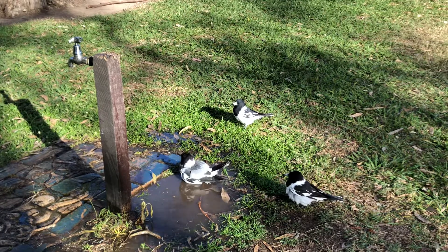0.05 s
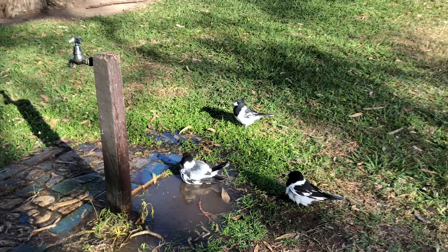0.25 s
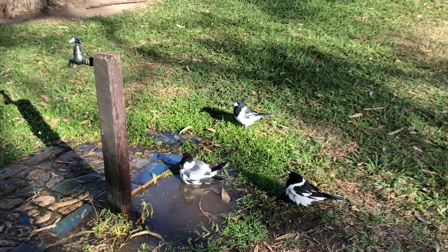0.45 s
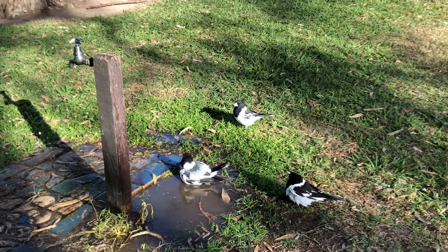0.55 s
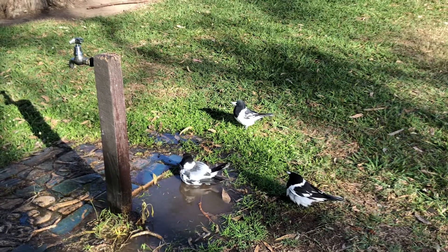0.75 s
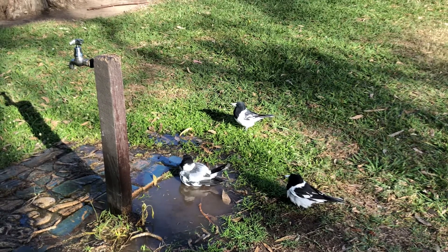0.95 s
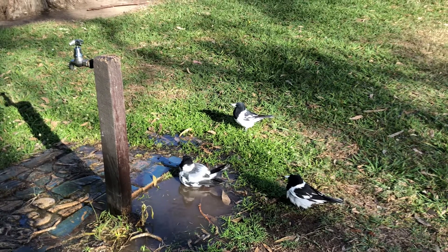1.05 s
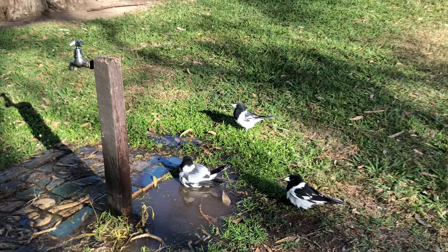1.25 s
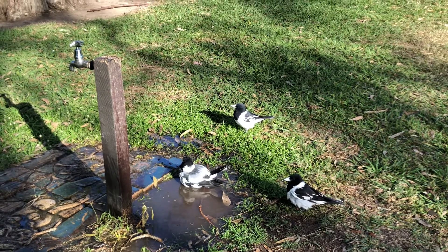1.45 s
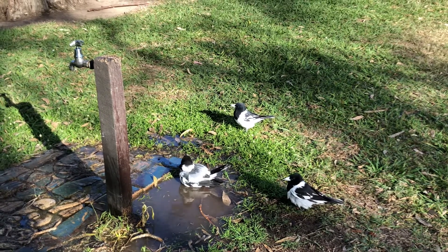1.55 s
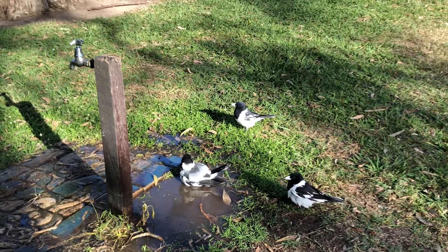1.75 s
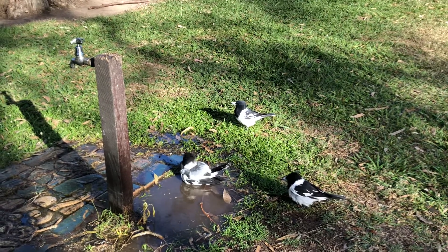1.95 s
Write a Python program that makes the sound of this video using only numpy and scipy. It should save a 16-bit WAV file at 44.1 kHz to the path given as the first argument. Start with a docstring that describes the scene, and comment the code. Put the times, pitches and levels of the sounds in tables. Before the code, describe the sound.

Wind rumbles on the microphone over a steady outdoor hiss, gusting with abrupt thumps near 0.4, 0.85 and 1.3 seconds. Far-off small birds give faint rising whistles throughout, and a bird in a puddle makes tiny ticks and barely audible splashes until about 1.4 seconds. From 1.5 seconds the wind drops and the birds chatter faintly, with a soft, short hoarse call near 1.9 seconds.

```python
"""A grassy yard on a breezy day. It opens on steady outdoor hiss and a low wind rumble on the microphone.
Close by, a bird bathing in a puddle makes a few tiny ticks, then a faint high rustle, while small birds
far off in the trees start trading chirps and rising whistles. Three gusts buffet the microphone with
abrupt thumps, near 0.4 s, 0.85 s and 1.3 s. As the wind drops, the small birds chatter, and at the very
end a bigger one gives a short hoarse call."""
import sys
import numpy as np
from scipy import signal
from scipy.fft import rfft, irfft, next_fast_len
from scipy.io import wavfile
from scipy.ndimage import map_coordinates

SR = 44100
rng = np.random.default_rng(int(sys.argv[2]) if len(sys.argv) > 2 else 0)


def unload_audio(sound):
    """Save the sound as a 16-bit wav file, at the path given as the first command line argument."""
    columns = np.transpose(np.atleast_2d(sound))
    # keep every value between -1 and 1, then stretch to whole-number steps
    steps = np.round(np.clip(columns, -1, 1) * 32767)
    wavfile.write(sys.argv[1], SR, steps.astype(np.int16))


N = 88200

# fader ride of the wind rumble (t/s, relative level/dB)
RUMBLE_RIDE = [(0, -51.5), (.185, -58.5), (.22, -45.5), (.265, -48), (.39, -36.5), (.45, -46.5),
               (.485, -43), (.6, -60), (.635, -44.5), (.755, -47.5), (.85, -42), (.915, -44), (.965, -41),
               (1.0, -50), (1.07, -53.5), (1.17, -54.5), (1.29, -37.5), (1.355, -52.5), (1.44, -42.5),
               (1.6, -55.5), (1.72, -59.5), (1.86, -54.5), (2, -59)]
# colour of the wind rumble (f/Hz, relative level/dB)
RUMBLE_SPECTRUM = [(22, -55), (32, -16), (48, -7.5), (75, -1), (140, -4.5), (210, -12), (290, -26),
                   (450, -32.5), (1500, -89)]
# single eddies rolling over the microphone (peak t/s, length/s, centre f/Hz, level/dB)
BUFFETS = [ (0.119, 0.023, 250, -48.5), (0.272, 0.033, 292, -52.5), (0.316, 0.016, 76.5, -30.5),
           (0.393, 0.038, 106.6, -29), (0.403, 0.058, 257, -46.5), (0.701, 0.024, 273, -49.5),
           (0.71, 0.026, 132, -32), (0.806, 0.019, 98, -32), (0.841, 0.014, 211, -38.5),
           (1.249, 0.033, 169, -29.5), (1.293, 0.039, 92, -32.5), (1.395, 0.019, 156, -33),
           (1.924, 0.14, 201, -60)]
# pressure kicks on the microphone (t/s, settled f/Hz, level/dB)
THUMPS = [ (0.207, 176, -39), (0.364, 141, -24.5), (0.378, 128, -28), (0.850, 150, -25),
          (0.859, 109, -22.5), (0.960, 169, -32.5), (1.198, 162, -26), (1.224, 172, -25.5),
          (1.272, 172, -24), (1.302, 167.4, -22), (1.307, 108, -21.5), (1.375, 189, -29)]
# rising whistles (t/s, length/s, start f/Hz, turn f/Hz, end f/Hz, share before the turn, level/dB)
WHISTLES = [ (0.223, 0.15, 3250, 4440, 4080, 0.8, -62.5), (0.403, 0.061, 3590, 3980, 3900, .7, -65.5),
            (0.514, 0.064, 3180, 3360, 3300, 0.96, -67), (0.559, 0.032, 2625, 2930, 3000, 0.83, -62.5),
            (0.589, 0.038, 3460, 3850, 3540, 0.32, -62), (0.63, 0.049, 3950, 4524, 4100, 0.82, -60.5),
            (0.651, 0.15, 3090, 3936, 3700, 0.82, -66.5), (0.845, 0.14, 3380, 4140, 4080, 0.95, -66),
            (1.009, 0.083, 3350, 3980, 3900, 0.86, -63.5), (1.145, .022, 3600, 3980, 3900, 0.67, -65),
            (1.267, 0.031, 3610, 3880, 4000, 0.77, -63), (1.325, 0.09, 3200, 3410, 3340, 1, -62),
            (1.345, 0.068, 3420, 3990, 4000, 0.78, -64), (1.409, 0.1, 3750, 4000, 3530, 0.14, -61),
            (1.653, 0.063, 3700, 3850, 3390, .3, -64.5)]
# thin, short chirps (t/s, length/s, start f/Hz, end f/Hz, level/dB)
CHIRPS = [(0.166, 0.02, 6200, 7800, -70), (0.327, 0.012, 2140, 2080, -58.5),
          (1.398, 0.023, 5800, 7800, -68)]
# raspy chatter and, last, the bigger bird's call (t/s, length/s, centre f/Hz, width/Hz, level/dB)
RASPS = [(1.515, .06, 3400, 450, -64), (1.552, .045, 3850, 450, -67), (1.584, .06, 4200, 300, -68.5),
         (1.613, .12, 3570, 550, -70), (1.913, .11, 3800, 500, -68), (1.93, 0.043, 1240, 344, -57)]
# splashes in the puddle (peak t/s, length/s, level/dB)
SPLASHES = [(.218, .022, -72), (.434, 0.039, -69), (.505, .026, -71), (.635, .032, -72), (.75, .045, -73),
            (.99, .04, -77.5), (1.1, .02, -76), (1.24, .025, -77), (1.37, .02, -76)]
# colour of the splashes and trickle (f/Hz, relative level/dB)
RUSTLE_SPECTRUM = [(3000, -66), (8000, -12), (11000, -11.5), (14500, -9.5), (16000, -15)]
# droplet ticks (t/s, level/dB)
TICKS = [(0.1325, -55), (.139, -61), (.261, -65)]
# colour of the ticks (f/Hz, relative level/dB)
TICK_SPECTRUM = [(5000, -27), (10000, -7), (12500, -10), (15000, -1)]
# fader ride of the far wind in the trees (t/s, relative level/dB)
TREES_RIDE = [(0, -58), (.6, -56), (1.1, -63), (1.55, -52), (2, -56)]
# colour of the wind in the trees (f/Hz, relative level/dB)
TREES_SPECTRUM = [(200, -23), (480, 4), (650, 7.5), (1000, 0.5), (1800, -21), (5000, -47)]
# colour of the outdoor hiss (f/Hz, relative level/dB)
AIR_SPECTRUM = [(25, -28), (70, -2), (200, 2), (380, -4), (700, -1), (1100, -4.5), (1600, -8), (2900, -11),
                (3900, -11.5), (5200, -16), (7500, -22), (10000, -29), (12500, -39), (16000, -40.5)]


def amp(db):
    """Decibels to gain."""
    return 10 ** (np.asarray(db) / 20)


def unit(x):
    """Scaled to rms 1."""
    return x / np.sqrt(np.mean(x ** 2) + 1e-20)


def curve(rows):
    """(t/s, value) rows as one value per sample."""
    return np.interp(np.arange(N) / SR, *np.transpose(rows))


def wobble(rate):
    """A smooth random curve, rate knots a second."""
    return map_coordinates(rng.standard_normal(2048), [np.arange(N) * rate / SR], mode="wrap")


def filtered(x, response):
    """x through an EQ whose gain is response(hz)."""
    size = next_fast_len(N + SR // 2)
    return irfft(rfft(x, size) * response(np.fft.rfftfreq(size, 1 / SR)), size)[:N]


def noise(spectrum):
    """Noise of rms 1 with the given (f/Hz, level/dB) colour."""
    f, db = np.transpose(spectrum)
    white = rng.standard_normal(N)
    return unit(filtered(white, lambda hz: amp(np.interp(np.log(hz + 1), np.log(f), db))))


def eddies(spectrum, even_s):
    """Churning noise, levelled so that it holds steady over spans longer than even_s."""
    churn = noise(spectrum)
    window = np.exp(-.5 * (np.arange(-SR // 10, SR // 10) / SR / even_s) ** 2)
    power = np.abs(signal.fftconvolve(churn ** 2, window, "same"))
    return unit(churn / np.sqrt(power + 1e-9))


def buffeting():
    """Wind on the microphone: a gusting rumble, and single eddies that each swell in their own band."""
    trim_db, skirt_db_per_octave, tip_octaves = 3.5, 27, 0.24
    out = amp(curve(RUMBLE_RIDE) + trim_db) * eddies(RUMBLE_SPECTRUM, even_s=0.045)
    t, octaves = np.arange(N) / SR, np.linspace(-4, 4, 41)
    band_db = -skirt_db_per_octave * np.hypot(octaves, tip_octaves)  # a peak with a rounded tip
    for peak_s, length, centre_hz, db in BUFFETS:
        swell = np.exp(-2 * ((t - peak_s) / length) ** 2)
        band = np.column_stack([centre_hz * 2 ** octaves, band_db])
        out += amp(db) * swell * eddies(band, even_s=0.0066)
    return out


def thumps():
    """Pressure kicks on the microphone: each starts high, sinks in pitch and dies in a few cycles."""
    attack_s, t60_s, settle_s, overshoot = .0018, 0.078, 0.0028, 1.63
    out = np.zeros(N)
    for start, hz, db in THUMPS:
        t = np.maximum(np.arange(N) / SR - start, 0)
        pitch_hz = hz * (1 + overshoot * np.exp(-t / settle_s))
        cycles = np.cumsum((t > 0) * pitch_hz) / SR
        envelope = (1 - np.exp(-(t / attack_s) ** 2)) * amp(db - 60 * t / t60_s)
        out += envelope * np.sin(2 * np.pi * (cycles + rng.random()))
    return out


def note(start, length, edge_s=0.0065):
    """Progress 0-1 through a bird's note, and its soft-edged envelope."""
    t = np.arange(N) / SR - start
    edge = np.clip(np.minimum(t, length - t) / edge_s + .5, 0, 1)
    return np.clip(t / length, 0, 1), np.sin(edge * np.pi / 2) ** 2


def tone(hz, waver=.011, flicker_db=2.04):
    """A bird's pure voice, slightly unsteady in pitch and level."""
    phase = 2 * np.pi * np.cumsum(hz * (1 + waver * wobble(260))) / SR
    return np.sqrt(2) * np.sin(phase) * amp(flicker_db * wobble(89.68))


def far_birds():
    """Whistles swell as they sweep up, then ease off; chirps are quick glides; rasps are narrow noise."""
    rise_bend, release_bend, swell_db = 1.9, 2.7, 2.5
    out = np.zeros(N)
    for start, length, start_hz, turn_hz, end_hz, share, db in WHISTLES:
        progress, envelope = note(start, length)
        turn = np.clip(share, .05, .97)
        rise = np.clip(progress / turn, 0, 1) ** rise_bend
        release = np.clip((progress - turn) / (1 - turn), 0, 1) ** release_bend
        hz = start_hz + (turn_hz - start_hz) * rise + (end_hz - turn_hz) * release
        out += amp(db + swell_db * (rise - release - 1)) * envelope * tone(hz)
    for start, length, start_hz, end_hz, db in CHIRPS:
        progress, envelope = note(start, length)
        out += amp(db) * envelope * tone(start_hz + (end_hz - start_hz) * progress)
    for start, length, centre_hz, width_hz, db in RASPS:
        _, envelope = note(start, length)
        white = rng.standard_normal(N)
        band = filtered(white, lambda hz: 1 / (1 + (2 * (hz - centre_hz) / width_hz) ** 4))
        out += amp(db) * envelope * unit(band)
    return out


def echo(x, t60_s=0.6, wet_db=-5.5):
    """A diffuse tail scattered back from trees and ground."""
    t = np.arange(SR // 2) / SR
    tail = rng.standard_normal(len(t)) * amp(-60 * t / t60_s)
    return amp(wet_db) * signal.fftconvolve(x, tail / np.linalg.norm(tail))[:N]


def bathing_bird(trickle_db=-79.5, tick_t60_s=0.02):
    """A bird in a puddle: short grainy splashes over a faint trickle, and a few droplet ticks."""
    t = np.arange(N) / SR
    grains = unit(noise(RUSTLE_SPECTRUM) * amp(2.4 * wobble(360)))
    splashes = sum(amp(db) * np.exp(-2 * ((t - at) / length) ** 2) for at, length, db in SPLASHES)
    ticks = sum((t >= at) * amp(db - 60 * np.abs(t - at) / tick_t60_s) for at, db in TICKS)
    return np.hypot(amp(trickle_db), splashes) * grains + ticks * noise(TICK_SPECTRUM)


def ambience(hiss_db=-54.5, trees_trim_db=-7):
    """The bed: steady outdoor hiss and the far murmur of wind in the trees."""
    hiss = amp(hiss_db + 0.062 * wobble(7.4)) * noise(AIR_SPECTRUM)
    trees = amp(curve(TREES_RIDE) + trees_trim_db) * noise(TREES_SPECTRUM)
    return hiss + trees


def scene():
    """The mono mix; only the far birds get the echo."""
    calls = far_birds()
    return (buffeting() + thumps() + ambience() + calls + echo(calls) + bathing_bird())[None]


def record(dry):
    """A brick-wall high cut on the whole mix."""
    top_hz = 15800
    return filtered(dry[0], lambda hz: hz < top_hz)[None]


dry = scene()
out = record(dry)
unload_audio(out)
```